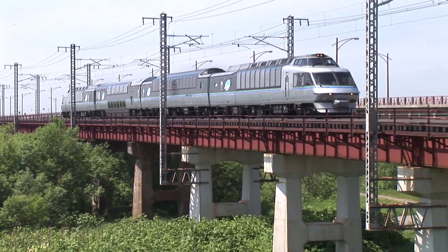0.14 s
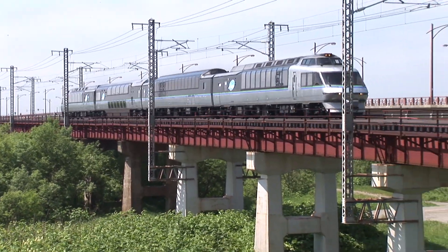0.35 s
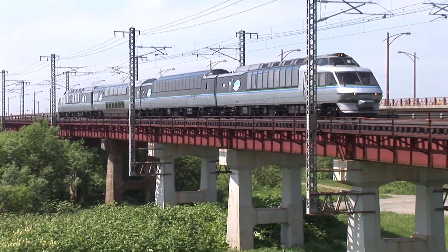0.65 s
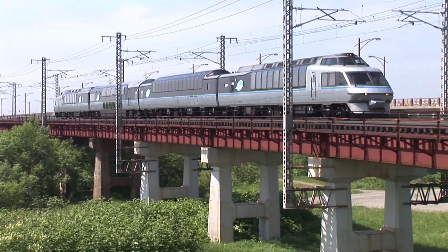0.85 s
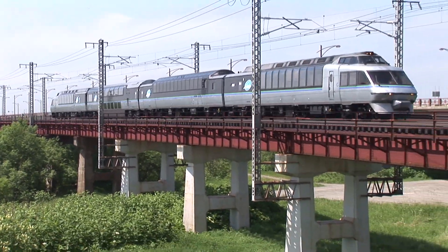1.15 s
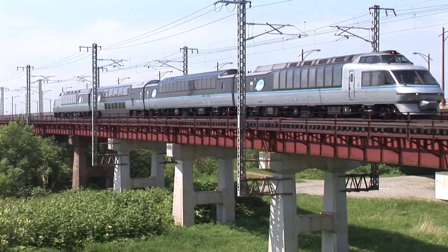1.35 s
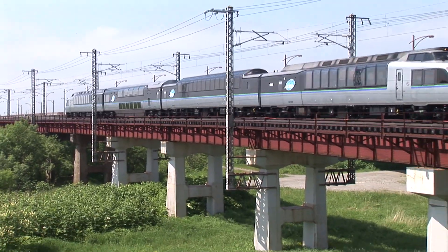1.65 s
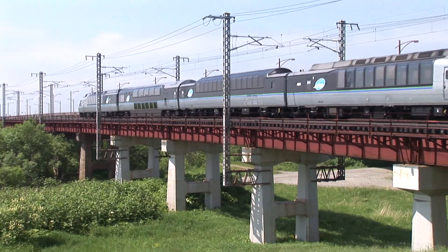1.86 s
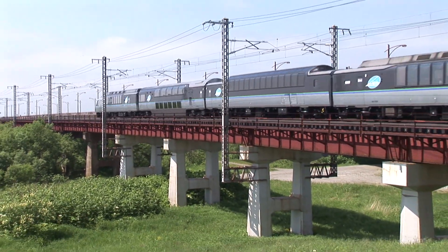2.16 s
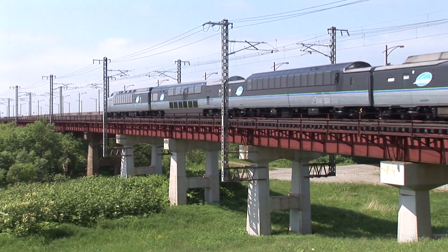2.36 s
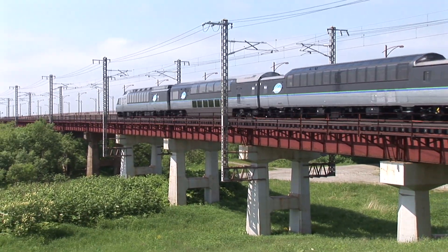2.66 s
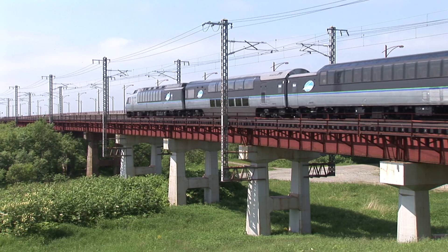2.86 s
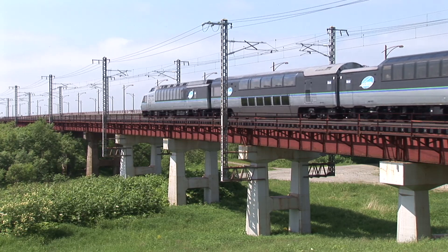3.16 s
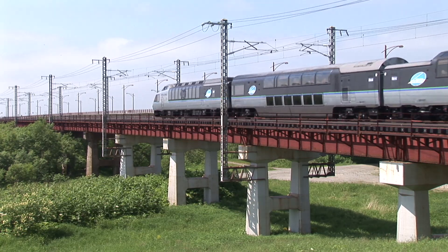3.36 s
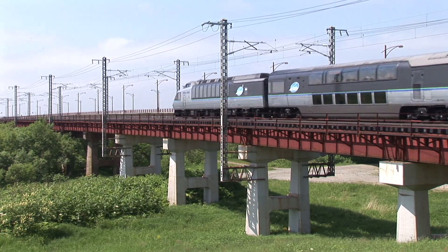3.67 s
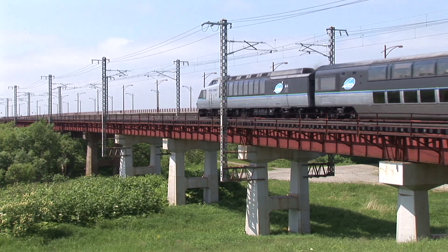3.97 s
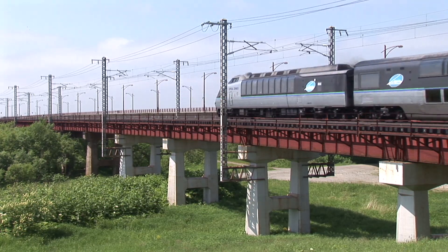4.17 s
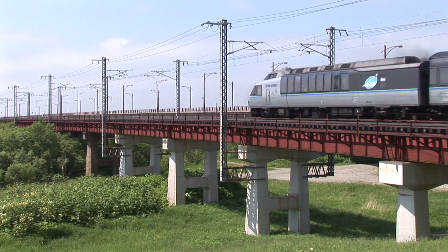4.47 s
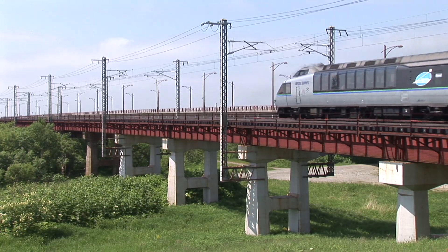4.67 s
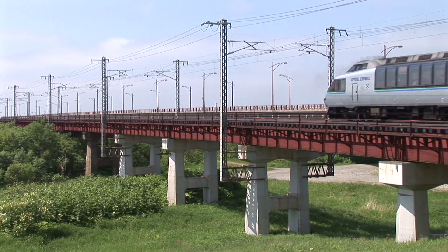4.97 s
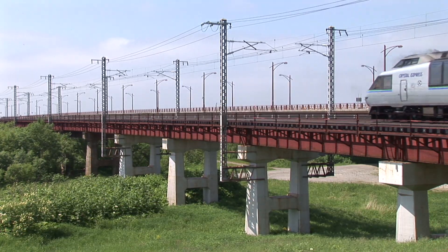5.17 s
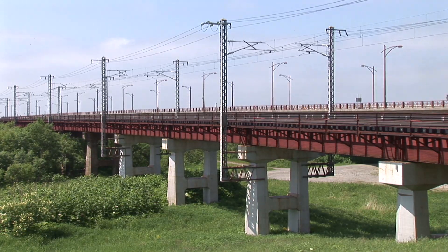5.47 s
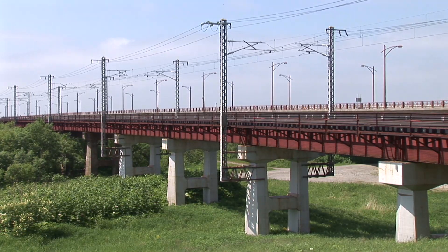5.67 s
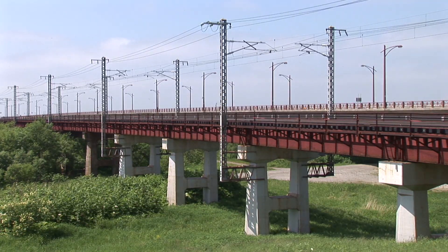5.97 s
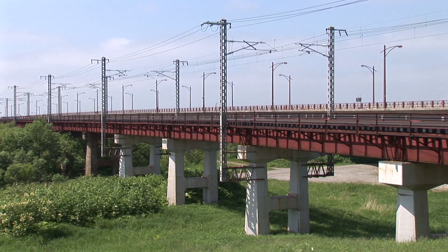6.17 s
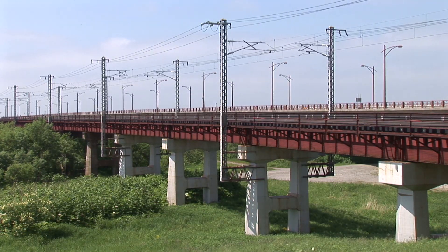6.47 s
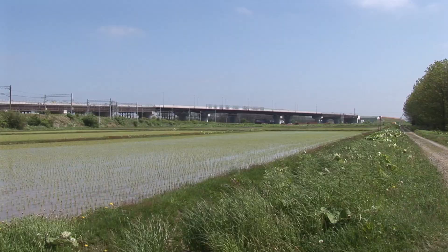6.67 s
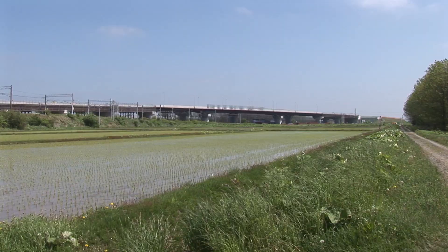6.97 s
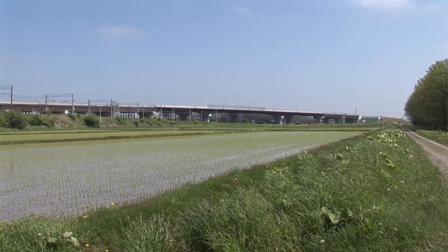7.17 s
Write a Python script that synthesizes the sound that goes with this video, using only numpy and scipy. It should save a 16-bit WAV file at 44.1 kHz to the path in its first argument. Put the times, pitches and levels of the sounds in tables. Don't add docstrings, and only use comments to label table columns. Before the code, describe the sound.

A stereo microphone near the track hears rough wheel roar and throbbing diesel engines swelling on a metal bridge. Clustered hard wheel knocks ring through the steel while plates hum and air hiss spits underneath. The train passes on the right and recedes after nearly six seconds. Abruptly the place changes to an open field, much quieter, with lumpy low wind and a distant steady hum.

```python
import sys
import numpy as np
from scipy import signal
from scipy.io import wavfile
from scipy.ndimage import uniform_filter1d

SR = 44100
rng = np.random.default_rng(int(sys.argv[2]) if len(sys.argv) > 2 else 0)


def voltage_ratio(level):
    return 10 ** (np.asarray(level, float) / 20)


def generate_wav(sig):
    pcm = np.round(np.clip(np.atleast_2d(sig).T, -1, 1) * 32767).astype(np.int16)
    wavfile.write(sys.argv[1], SR, pcm)


N = 322797

SIZE, HOP = 1024, 256
TOP_HZ = 14300
CUT_S = 6.747
OFF_SPAN_S = 5.9


def evened(x):
    return x / np.sqrt(np.mean(x ** 2) + 1e-20)


def slow_noise(shape, width):
    return evened(uniform_filter1d(uniform_filter1d(rng.standard_normal(shape), width), width))


def swell(t, s, length):
    return np.exp(-((t - s) / length) ** 2)


def glide(t, points):
    return np.interp(t, *np.transpose(points))


def read(points, hz, column=1):
    rows = np.transpose(points)
    return np.interp(np.log(hz + 1), np.log(rows[0] + 1), rows[column])


def grid():
    return np.fft.rfftfreq(SIZE, 1 / SR), np.arange(N // HOP + 5) * HOP / SR


def bumps(modes):
    hz = grid()[0][1:]
    return np.transpose([hz, sum(db / (1 + (2 * (hz - f) / width) ** 2) for f, width, db in modes)])


# (time [s], bearing [0 ahead, 1 beside, 2 gone by])
TRAIN_BEARING = [(0, 0.24), (1.2, 0.086), (2, 0.2), (2.3, 0.7), (4, 0.96), (5.6, 1.245), (5.85, 1.1),
                 (6.0, 1.4), (6.35, 1.57), (6.75, 1.89)]


def with_bearing(t, values):
    return np.interp(glide(t, TRAIN_BEARING), np.arange(len(values)), values)


def by_bearing(tables, column=1):
    hz, t = grid()
    place = np.clip(glide(t, TRAIN_BEARING), 0, len(tables) - 1)
    return sum(np.outer(read(table, hz, column), np.maximum(1 - abs(place - k), 0))
               for k, table in enumerate(tables))


def levelled(shape_db, curves, edges):
    hz, t = grid()
    s, *levels = np.transpose(curves)
    out, centres = shape_db.copy(), np.sqrt(np.prod(edges, axis=1))
    for k, ((lo, hi), level_db) in enumerate(zip(edges, levels)):
        band = shape_db[(hz >= lo) & (hz < hi)]
        own_db = 10 * np.log10((voltage_ratio(band) ** 2).sum(0))
        weight = np.interp(np.log(hz + 1), np.log(centres), np.arange(len(edges)) == k)
        out += np.outer(weight, np.interp(t, s, level_db) - own_db)
    return out


def mid_side(front_db, across_db, link, patchy_db, flicker_db):
    hz = grid()[0][:, None]
    a, b, c, d, patches, lean = rng.standard_normal((front_db.shape[1], front_db.shape[0], 6)).T
    flicker = evened(uniform_filter1d(patches, 200, 0)) * np.minimum(hz / 1500, 1)
    patches, lean = (evened(uniform_filter1d(uniform_filter1d(p, 9, 0), 10, 1)) for p in (patches, lean))
    roll_off_db = -np.clip(hz - TOP_HZ, 0, 95) / 5
    size = voltage_ratio(front_db + roll_off_db + patchy_db * patches + flicker_db * flicker) * np.sqrt(3 / 2)
    link = link / np.maximum(abs(link), 1)
    front = a + 1j * b
    side = link * front + np.sqrt(1 + 1e-6 - abs(link) ** 2) * (c + 1j * d)
    side *= voltage_ratio(across_db + lean)
    left_right = np.array([front + side, front - side]) * size
    return signal.istft(left_right, nperseg=SIZE, noverlap=SIZE - HOP)[1][:, :N]


def on_the_right(x):
    return np.array([voltage_ratio(-2) * np.roll(x, 3), voltage_ratio(3) * x])


# (pitch [Hz], level [dB per Hz])
FRONT_COLOUR = [
    [(25, -44.5), (103, -1), (190, -11.5), (435, -3.5), (649, -16.5), (1260, -20), (2400, -24),
     (3900, -29.5), (4500, -38), (5050, -37), (6500, -53), (9300, -61.5), (11500, -60), (14200, -61.5)],
    [(25, -29.5), (118, -3.5), (229, -9), (446, -1.5), (632, -8.5), (1300, -11), (4900, -35), (5400, -43.5),
     (6100, -49.5), (7000, -60), (8400, -50.5), (9300, -60), (11300, -47.5), (14200, -56)],
    [(25, -57), (59, 5.5), (324, -12), (615, -13), (1440, -24.5), (2050, -28), (2750, -35.5), (4800, -40),
     (6100, -53), (6800, -64), (8000, -55), (9300, -60), (11300, -47), (14200, -54)],
]
# (pitch [Hz], width [Hz], level [dB])
STEEL_MODES = [
    [(42, 14, 4), (293, 65, 2), (431, 82, 5.5), (795, 170, 5.5), (1090, 100, 7.5), (2030, 96, 2.5),
     (2800, 490, 3), (3870, 330, 1.5), (6450, 460, 3)],
    [(40.6, 24, 10), (285.5, 53, 5.5), (423, 62, 4.5), (459.5, 25, 5.5), (1150, 87, 4), (1480, 137, 6.5),
     (2030, 300, 6.5), (2765, 430, 7.5), (3656, 390, 6), (6300, 520, 1.5)],
    [(43, 25, 4), (1205, 130, -15), (1410, 140, 1.5), (1695, 184, -12.5), (2030, 140, -9),
     (2300, 660, -3.5), (2700, 110, 3), (2960, 130, -8.5), (3730, 180, -0.5), (6760, 850, -8)],
]


def steel_db():
    return by_bearing(FRONT_COLOUR) + by_bearing([bumps(modes) for modes in STEEL_MODES])


# (pitch [Hz], level [dB])
SIDE_OVER_FRONT = [
    [(60, -67), (310, -23.5), (930, -14.5), (2200, -15.5), (3400, -24), (5000, -14), (6000, 8), (7000, 0),
     (8400, 2.5), (9400, 9), (10400, -9), (11200, -18), (12200, 2), (14200, -1)],
    [(60, -51), (310, -18), (930, -3.5), (2770, -7), (4000, -9.5), (5000, 1.5), (5900, 14.5), (7000, 13.5),
     (8400, 4.5), (9300, 13.5), (10300, -12), (11200, -8.5), (12200, 0), (14200, -1.5)],
    [(60, -48), (310, -8), (930, 3.5), (2050, 6), (2770, 0), (5000, -7), (5900, 10.5), (6700, 21),
     (7400, -3), (9300, 9), (10300, -6), (11200, -8), (12200, -3), (14200, 4)],
]
# (pitch [Hz], in step [share], a quarter turn ahead [share])
SIDE_LINK = [
    [(400, 0.14, -.42), (1300, -0.42, -.22), (2000, -.5, -.2), (3700, -.05, -.3), (4400, -.12, -.4),
     (5100, -.3, .1), (7000, .04, -.1), (13500, -.08, -.06)],
    [(400, .2, -.7), (800, -.15, -.8), (1500, -.75, -.42), (2600, -.6, -.3), (3100, -.52, -.45),
     (3700, -.2, -.65), (4400, -.4, -.75), (5100, -.1, -.1), (7000, 0, 0), (8200, -.5, .15),
     (11000, -0.32, 0.29), (13500, -0.86, -.13)],
    [(400, .7, -.65), (600, .1, -1), (850, -.35, -.95), (1600, -.87, -.42), (2050, -.78, -.6),
     (2550, -.6, .8), (3100, -.8, .6), (3700, -1, -.1), (4400, -.72, -.7), (5100, -.1, -.9),
     (6000, -.65, -.65), (8200, -.75, .1), (13500, -0.91, -.15)],
]
# (pitch [Hz], width [Hz],
# level [dB])
PORT_NULLS = [
    [(650, 100, -4), (950, 100, -4), (1280, 130, -8), (4430, 350, -10), (5000, 400, 5), (5700, 200, -6),
     (8400, 600, 4)],
    [(650, 100, -3), (980, 100, -4), (1280, 130, -7), (5000, 400, 4)],
    [(2310, 200, -9), (4350, 300, -4), (5000, 300, 3)],
]


def train_noise(front_db, patchy_db, flicker_db):
    null_db = by_bearing([bumps(modes) for modes in PORT_NULLS])
    link = by_bearing(SIDE_LINK) + 1j * by_bearing(SIDE_LINK, column=2)
    return mid_side(front_db + null_db, by_bearing(SIDE_OVER_FRONT) - null_db, link, patchy_db, flicker_db)


# (time [s], level [dB])
NEARNESS = [(0, -31), (.33, -29), (.56, -30.5), (.8, -26.5), (1.1, -25.5), (1.3, -25), (1.5, -25),
            (1.7, -24), (2.0, -23), (2.3, -22.5), (3.7, -22.5), (4.3, -23), (5.25, -24), (5.5, -25),
            (5.87, -24.5), (6.2, -25.5), (6.55, -29), (6.74, -31.5)]
# (low edge [Hz], high edge [Hz])
BAND_EDGES = [
    (25, 200),
    (200, 600),
    (600, 5500),
    (10000, 14500),
]
# (nearness followed [share], ahead [dB], beside [dB], gone by [dB], gain under a bogie [dB])
ROLLING_PARTS = [
    (.3, -31, -28.5, -29, 3),
    (.7, -27.5, -29, -43, 2.0),
    (1, -25, -25, -20, 0.37),
    (1.5, -76.5, -64, -56, 4),
]
# (time [s], hiss gain [dB], length [s])
FANS = [
    (1.097, 2.5, 0.088),
    (2.738, -5, 0.48),
    (4.048, 3, 0.37),
    (5.005, 4, 0.11),
    (5.494, 2.5, .08),
    (5.863, 2.5, 0.11),
    (6.75, 13.5, 0.059),
]
# (time [s], gain [dB])
SPITS = [(1.13, 0), (1.18, 6), (1.73, 7), (3.05, -3), (3.56, 0), (3.93, 4), (4.035, 6.5), (4.241, 9.5),
         (4.44, 2.5), (4.56, 5), (4.885, 1.5), (5.03, 3.5), (5.4, 6.5), (5.495, 7.5), (5.73, 6.5),
         (5.82, 7.5), (6.02, -3.5), (6.2, -5.5), (6.28, 6.5), (6.33, 5), (6.43, 1), (6.6, 7)]
# (time [s], pitch [Hz], gain [dB], length [s])
SINGING = [(0.14, 280, 11, 0.079), (0.33, 435, -4, 0.3), (1.1, 260, -8, 0.09), (1.33, 294, 9, 0.14),
           (1.28, 430, -5, 0.08), (1.33, 1560, 5.5, 0.077), (1.61, 1450, 4, 0.32), (1.4, 2370, 6.5, 0.18),
           (6.4, 2700, 0, 0.22), (6.35, 2280, -11, 0.36), (6.9, 3700, 2, 0.27), (6.55, 103, -10, .08),
           (3.5, 150, 3, 0.11), (1.55, 447, 1.5, 0.06), (2, 2300, 4, 0.074), (2.0, 273, 11, 0.35),
           (2.082, 430, 3, 0.038), (2.6, 433, 2, .1), (3.173, 400, -4, 0.083), (3.6, 290, -10, 0.058),
           (3.857, 420, 2, 0.1), (4.046, 424, -1, 0.064), (4.15, 142, 15, .1), (4.554, 270, -9, 0.084),
           (4.503, 423, 3.5, 0.13), (5.0, 428, 1.5, 0.24), (5.152, 554, -7, 0.21), (5.53, 430, 5, .15),
           (5.453, 210, 2, .1), (5.835, 380, 6, .03), (.92, 440, -1, 0.16), (6.28, 130, 7, 0.029),
           (6.43, 138, 7, .03), (5.9, 130, 6, 0.027), (3.3, 140, 4, .1), (5.96, 420, -5, 0.055),
           (4.165, 1600, 0, 0.026), (3.8, 1500, 5, .025), (5.846, 290, -21, 0.12)]


def rolling():
    hz, t = grid()
    near_db = glide(t, NEARNESS) + 22.5
    bogie_s, bogie_lag_s = 0.14, 0.0066
    load = np.tanh(sum(voltage_ratio(db + 5.5) * swell(t, s + bogie_lag_s, bogie_s) for s, db, *ring in AXLES))
    levels = np.array([share * near_db + with_bearing(t, way) + bogie_db * load
                       for share, *way, bogie_db in ROLLING_PARTS])
    rumble, girders, rails, hiss = levels
    girders += -4 * (1 + np.tanh((t - OFF_SPAN_S) / .02)) / 2
    unload_s, unload_db_per_s = 5.4, -1
    girders += unload_db_per_s * np.clip(t - unload_s, 0, OFF_SPAN_S - unload_s)
    hiss += sum(db * swell(t, s, length) for s, db, length in FANS)
    hiss += sum(db * swell(t, s, 0.011) for s, db in SPITS)
    octave, song_octaves = np.log2(hz + 1), 0.11
    song_db = sum(db * np.outer(swell(octave, np.log2(f), song_octaves), swell(t, s, length))
                  for s, f, db, length in SINGING)
    roar_db = levelled(steel_db(), np.vstack([t, levels]).T, BAND_EDGES)
    return train_noise(roar_db + song_db, patchy_db=0.63, flicker_db=0.5)


# (pitch [Hz], ahead [dB], beside [dB], gone by [dB])
FIRING_ORDERS = [
    (57.9, -52.5, -36, -38),
    (86.1, -50, -44, -41),
    (114.9, -34, -38, -42),
    (155.8, -38.5, -45, -40.5),
]
# (time [s], order [Hz], gain [dB], length [s])
IN_STEP = [(.05, 113, 2.5, 0.15), (.4, 113, -0.5, 0.32), (.8, 113, 5, 0.1), (0.19, 113, 6, 0.043),
           (0.54, 113, 5, 0.13), (1.15, 113, 5, 0.057), (.8, 156, 9.5, 0.09), (.4, 156, -9, 0.11),
           (2.5, 113, -9, 0.2), (6.547, 113, -9, 0.13), (1.23, 88, 19.5, 0.16), (1.602, 113, -24, 0.24),
           (1.95, 113, -8, .1), (3.45, 113, -3, 0.11), (5.5, 58, 6.5, 0.21), (1.84, 88, 17, 0.07),
           (2.5, 58, 7, 0.17), (3.24, 113, 8, 0.21), (2.9, 58, -9, 0.17), (3.2, 58, 8, 0.1),
           (3.54, 58, 12.5, 0.19), (3.958, 113, 15, 0.053), (4.26, 113, 7, 0.35), (3.8, 58, 8, 0.2),
           (4.73, 88, 15.5, 0.098), (4.9, 113, 6.5, 0.12), (5.405, 58, 8, 0.11), (5.85, 58, 2, 0.17),
           (6.3, 88, -3, 0.25)]
# (time [s], speed [share of full])
ENGINE_SPEED = [
    (0, .985),
    (1.1, .965),
    (1.35, 1.0),
    (7.32, 1.0),
]


def engines():
    t, out = np.arange(N) / SR, np.zeros(N)
    speed = glide(t, ENGINE_SPEED)
    for hz, *way in FIRING_ORDERS:
        waver = slow_noise((2, N), 2500)
        drift = 0.008 * slow_noise(N, 9000)
        swell_db = sum(db * swell(t, s, length) for s, f, db, length in IN_STEP if abs(f / hz - 1) < 1 / 8)
        turn = 2 * np.pi * np.cumsum(hz * speed * (1 + drift)) / SR + 0.55 * waver[0]
        out += voltage_ratio(with_bearing(t, way) + swell_db + 1.5 * waver[1]) * np.sin(turn)
    return voltage_ratio([[.2], [-.2]]) * out


# (time [s], peak level [dB], ring pitch [Hz], ring level [dB])
AXLES = [(0.1194, -27.5, 1500, -1), (1.28, -22.5, 2410, -12), (1.6994, -27, 2030, 0),
         (1.9094, -15, 2080, -10), (2.1494, -23.5, 2030, 5), (2.2428, -11.5, 1500, -14),
         (2.2794, -12.5, 1334, -15), (2.3381, -9.5, 1493, -3.5), (2.78, -14, 1540, -12),
         (2.8894, -10, 1465, -2), (2.9884, -11, 1493, -5), (3.196, -10.5, 2016, -5.5),
         (3.2894, -9.5, 1490, -12), (3.8421, -10, 1494, -11), (3.9362, -14.5, 1550, -18),
         (4.1465, -11, 2150, -9), (4.2405, -10, 2270, -13), (4.4881, -27, 1520, -11),
         (4.782, -9.5, 1940, -14), (4.806, -16.5, 2160, 0), (4.8838, -9, 2030, -7.5),
         (5.098, -10, 1460, -3.5), (5.184, -11, 1410, -9), (5.2394, -15.5, 1910, -9),
         (5.7314, -11.5, 1470, -1), (5.8287, -10.5, 1410, -10), (6.1886, -23.5, 1500, -11),
         (6.4014, -23, 1330, -7), (6.621, -28.5, 1370, -2), (6.712, -25.5, 486, -16)]


def joints():
    hz = grid()[0]
    # (pitch [Hz], level [dB])
    blow = [(150, -2.5), (450, -7.0), (900, -1.5), (1500, 2.5), (3000, 4.0), (6000, 3.5), (13000, -1.5)]
    colour = steel_db() + read(blow, hz)[:, None]
    colour = levelled(colour, [(0, 0), (N / SR, 0)], [(1300, 4000)])
    rattle = train_noise(colour, patchy_db=.8, flicker_db=.8)
    rise_s, fall_s, buzz_s = 0.015, 0.02, 0.056
    ring_s = 0.55 * 2 * fall_s
    jolt, ring, u = np.zeros(N + SR), np.zeros(N + SR), np.arange(-2000, 7000) / SR
    before, after = np.minimum(u, 0), np.maximum(u, 0)
    for (s, peak_db, ring_hz, ring_db), turn in zip(AXLES, rng.random(len(AXLES))):
        at = round((s + 0.0087) * SR)
        tail = swell(after, 0, fall_s) + voltage_ratio(-11.5) * np.exp(-after / buzz_s)
        shape = voltage_ratio(peak_db - 17.5) * swell(before, 0, rise_s) * tail
        pair = np.sin(2 * np.pi * ring_hz * u) + 0.15 * np.sin(2 * np.pi * (1.8 * ring_hz * u + turn))
        jolt[at:at + len(u)] += shape ** 2
        ring[at:at + len(u)] += voltage_ratio(ring_db + 5.5) * shape * pair * swell(u, 0, ring_s)
    jolt, ring = jolt[2000:][:N], ring[2000:][:N]
    chatter = voltage_ratio(1.7 * slow_noise(N, 90) - .4)
    return np.sqrt(jolt) * rattle * chatter + on_the_right(ring)


# (time [s], pitch [Hz], peak level [dB])
WEB_HUMS = [(0.515, 433, -30), (0.683, 446, -26), (1.166, 422, -28), (1.287, 431, -26), (1.37, 429, -25),
            (1.487, 443, -21.5), (1.987, 444, -28), (2.327, 423, -24), (2.385, 451, -22),
            (2.807, 450, -23.5), (2.885, 433, -22), (3.01, 420, -25), (3.152, 450, -23), (3.33, 469, -21),
            (3.394, 438, -22), (3.784, 437, -21), (3.883, 435, -21), (3.979, 456, -23), (4.177, 417, -24),
            (4.816, 433, -27), (4.932, 425, -25), (5.408, 445, -22.5), (5.774, 427, -31), (5.836, 421, -29)]


def webs():
    out, u = np.zeros(N), np.arange(-4000, 4000) / SR
    for s, hz, db in WEB_HUMS:
        at = round(s * SR) - 4000
        out[at:at + len(u)] += voltage_ratio(db) * swell(u, 0, 0.016) * np.sin(2 * np.pi * hz * (u + s))
    return np.array([np.roll(out, 2), out])


# (time [s], ring pitch [Hz], peak level [dB])
KNOCKS = [(2.242, 2110, -20.5), (2.266, 2140, -22), (2.313, 1540, -22), (2.356, 2420, -23),
          (2.896, 1480, -29), (2.915, 2050, -22), (2.992, 1560, -27), (3.004, 2080, -27),
          (3.181, 3236, -28), (3.209, 2000, -18.5), (3.298, 1610, -28), (3.311, 2000, -23.5),
          (3.848, 2000, -20), (3.94, 1800, -28), (4.156, 2300, -25), (4.153, 1490, -24), (4.245, 2300, -18),
          (4.250, 1450, -20), (4.789, 1880, -21), (4.802, 1450, -20), (4.819, 1780, -27),
          (4.888, 2190, -19.5), (4.910, 1876, -22), (5.102, 1550, -20), (5.112, 1950, -21),
          (5.184, 1500, -24), (5.194, 1480, -23), (5.735, 1500, -24), (5.829, 1410, -28),
          (5.842, 1850, -24)]


def knocks():
    out, u = np.zeros(N + SR), np.arange(-200, 1000) / SR
    before, after = np.minimum(u, 0), np.maximum(u, 0)
    fall_s, sag = .003, .08
    shape = np.exp(-(before / .0012) ** 2 - after / fall_s)
    snap = voltage_ratio(-9) * np.exp(-(before / .0005) ** 2 - after / .0018)
    crack_hz, crack_db_per_octave = np.geomspace(1200, 5200, 12), -5
    for (s, hz, db), (turn, spread) in zip(KNOCKS, rng.random((len(KNOCKS), 2))):
        cycles = hz * (u + sag * fall_s * (1 - np.exp(-u / fall_s))) + turn
        edge = voltage_ratio(-12) * shape * np.sin(2 * np.pi * (1.3 + spread / 2) * cycles)
        crack = sum(voltage_ratio(crack_db_per_octave * np.log2(f / crack_hz[0]))
                    * np.cos(2 * np.pi * (f * u + spread * k * k)) for k, f in enumerate(crack_hz))
        ring = shape * (np.sin(2 * np.pi * cycles) + edge)
        out[round(s * SR):][:len(u)] += voltage_ratio(db) * (ring + snap * crack)
    return on_the_right(out[200:][:N])


# (time [s], pitch [Hz], level [dB], length [s])
SQUEAKS = [
    (3.5, 11600, -51, 0.0077),
    (6.719, 11400, -50, .005),
]


def squeaks():
    t = np.arange(N) / SR
    return sum(voltage_ratio(db) * swell(t, s, length) * np.sin(2 * np.pi * hz * t) for s, hz, db, length in SQUEAKS)


# (time [s], level [dB])
GUSTS = [
    (6.75, -59),
    (6.85, -52),
    (6.92, -50),
    (7.0, -46),
    (7.08, -50),
    (7.17, -43),
    (7.24, -49),
    (7.32, -46),
]
# (pitch [Hz], level [dB per Hz])
FIELD_COLOUR = [(15, -30), (30, -5), (60, 9), (113, 2), (500, -21), (1000, -22.5), (2300, -24.5),
                (3000, -32), (4400, -45.5), (4900, -40), (5500, -52), (7300, -57), (14200, -55)]
# (pitch [Hz], level [dB])
FIELD_SIDE = [(60, -23), (150, -31), (370, -10), (930, -5), (2300, -9), (3500, -10), (5000, -4), (6000, 8),
              (9000, 0), (14000, 3)]
# (pitch [Hz], in step [share], a quarter turn ahead [share])
FIELD_LINK = [(400, .16, .02), (793, -.09, -.31), (2000, -0.37, -.19), (4000, .1, -.04)]


def field():
    hz, t = grid()
    far_hum_db = -59
    curves = [(s, wind_db, far_hum_db) for s, wind_db in GUSTS]
    shape_db = levelled(read(FIELD_COLOUR, hz)[:, None] + 0 * t, curves, [(25, 300), (400, 5000)])
    link = read(FIELD_LINK, hz) + 1j * read(FIELD_LINK, hz, column=2)
    return mid_side(shape_db, read(FIELD_SIDE, hz)[:, None], link[:, None], patchy_db=.8, flicker_db=.3)


def scene():
    bridge = np.clip((CUT_S - np.arange(N) / SR) / 0.0018 + .5, 0, 1)
    train = rolling() + engines() + joints() + webs() + knocks() + squeaks()
    return bridge * train + (1 - bridge) * field()


# (pitch [Hz], level [dB])
DROP_BELOW = [(100, -31.5), (300, -29), (3000, -24.5), (5000, -18), (6000, -13), (6600, -5.5), (7300, -5.5),
              (8600, -7.5), (9300, -2), (14000, -6)]
# (start time [s], length [s])
LEAN_TIMES = [(2.358, 0.232), (2.916, 0.116), (3.217, 0.186), (3.45, 0.325), (3.868, 0.093), (3.984, 0.046),
              (4.169, 0.046), (4.262, 0.046), (4.541, 0.116), (4.704, 0.07), (4.796, 0.07), (4.959, 0.046),
              (5.121, 0.372), (5.516, 0.186), (5.748, 0.046), (6.027, 0.046), (6.491, 0.07), (6.631, 0.07)]
# (pitch [Hz], share)
LEAN_REACH = [(5600, .5), (6500, 1), (7400, 1), (8200, .25)]
WHOLE_TIMES = [2.247, 2.31, 2.345, 2.89, 3.85, 5.825, 6.73]
TOP_OPEN_TIMES = [2.247, 3.3, 3.85, 3.94, 4.25, 4.89, 5.02, 5.18, 5.82]


def thinned(x):
    frame, frame_start = 1024, 578
    n, k = np.arange(2 * frame, dtype=np.float32), np.arange(frame, dtype=np.float32)
    turns = np.outer(2 * n + 1 + frame, 2 * k + 1).astype(np.int64) % (8 * frame)
    cosine = np.cos(np.pi * np.arange(8 * frame) / (4 * frame))
    window = np.sin(np.pi * (n + .5) / (2 * frame))
    lapped = (cosine[turns] * window[:, None]).astype(np.float32)
    lead, count = 2 * frame - frame_start, N // frame + 4
    halves = np.pad([x[0] + x[1], x[0] - x[1]], [(0, 0), (lead, count * frame - N - lead)])
    halves = halves.reshape(2, count, frame)
    z = np.concatenate([halves[:, :-1], halves[:, 1:]], axis=2).astype(np.float32) @ lapped
    t = (np.arange(1, count) * frame - lead) / SR
    edges = np.r_[0:240:12, 240, 264, 292, 320:frame:32]
    bin_hz = SR / (2 * frame)
    power = np.add.reduceat(z ** 2, edges, axis=2) + 1e-20

    limit_db = 1.2 * uniform_filter1d(rng.standard_normal((len(t), 1)), size=3, axis=0)
    limit_db = limit_db + 2.0 * rng.standard_normal((len(t), len(edges)))
    near_db = np.where(t < OFF_SPAN_S, glide(t, NEARNESS), 0)
    limit_db += 1.5 * np.minimum(near_db + 26.5, 0)[:, None]
    lean = sum((t > s - HOP / SR) & (t < s + length + HOP / SR) for s, length in LEAN_TIMES)
    limit_db += np.outer(np.where(lean, 2.0, -4.2), read(LEAN_REACH, edges * bin_hz))

    top_open = abs(t[:, None] - TOP_OPEN_TIMES).min(1) < frame / SR * .7
    z *= np.where(k * bin_hz > TOP_HZ + 60, voltage_ratio(13) * top_open[:, None], 1).astype(np.float32)
    widths = np.diff(edges, append=frame)
    limit_db += read(DROP_BELOW, (edges + widths / 2) * bin_hz)
    keep = power / power[::-1] > voltage_ratio(limit_db) ** 2
    whole = (abs(t[:, None] - WHOLE_TIMES).min(1) < frame / SR / 2) | (t > CUT_S)
    back = (z * np.repeat(keep | whole[:, None], widths, axis=2)) @ lapped.T * (2 / frame)
    joined = (back[:, :-1, frame:] + back[:, 1:, :frame]).reshape(2, -1)
    front, side = joined[:, lead - frame:][:, :N].astype(float)
    return np.array([front + side, front - side]) / 2


def roll_off(x):
    return signal.sosfilt(signal.butter(12, 14790, fs=SR, output="sos"), x)


def record(dry):
    mix = thinned(dry)
    return roll_off(mix)


dry = scene()
out = record(dry)
generate_wav(out)
```